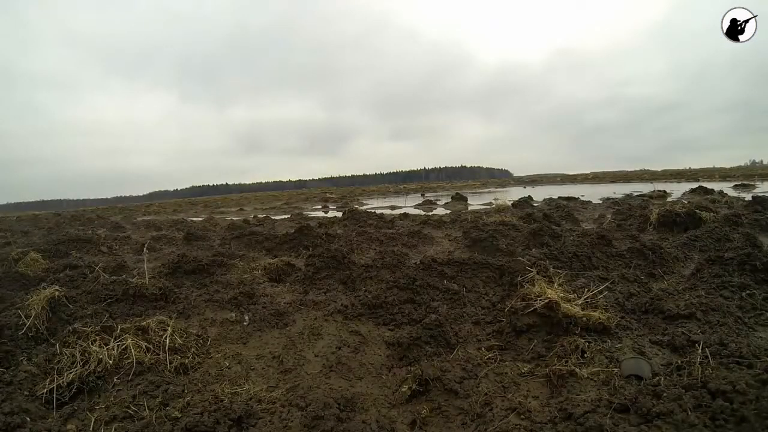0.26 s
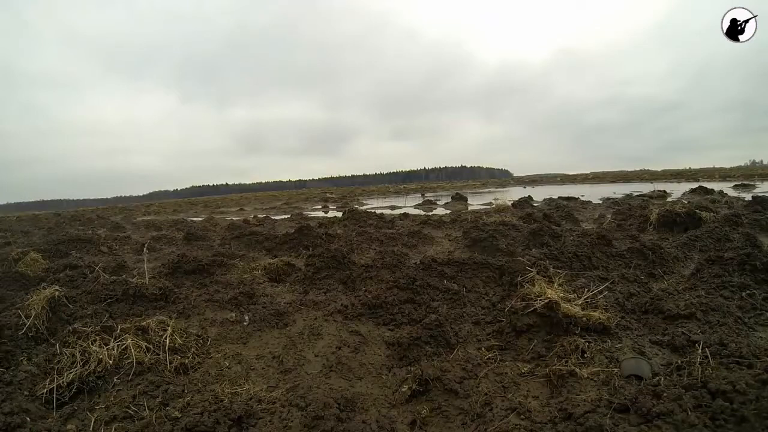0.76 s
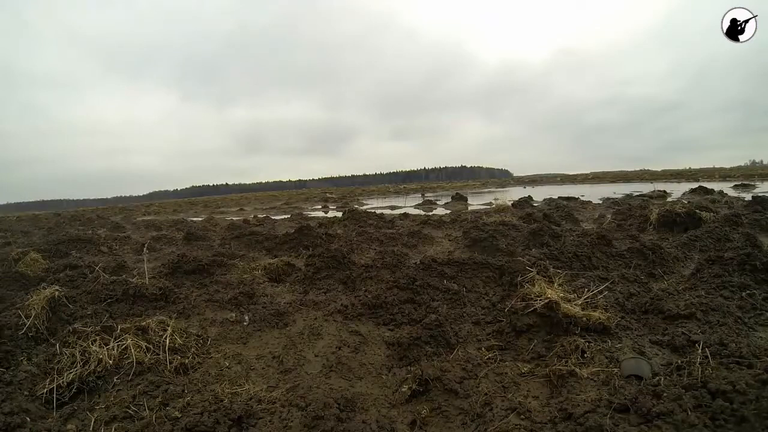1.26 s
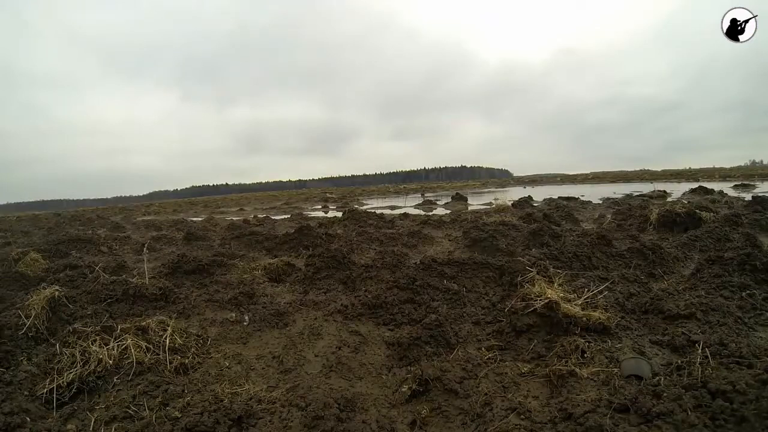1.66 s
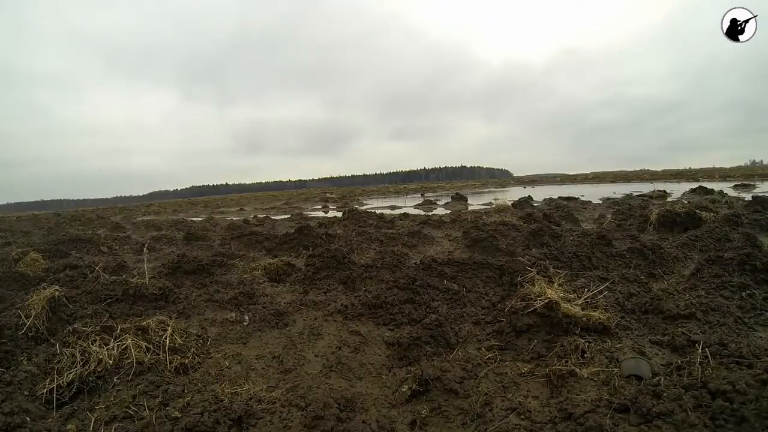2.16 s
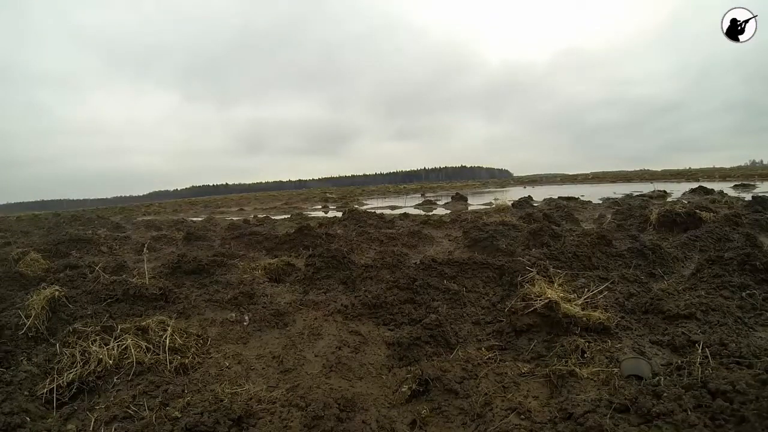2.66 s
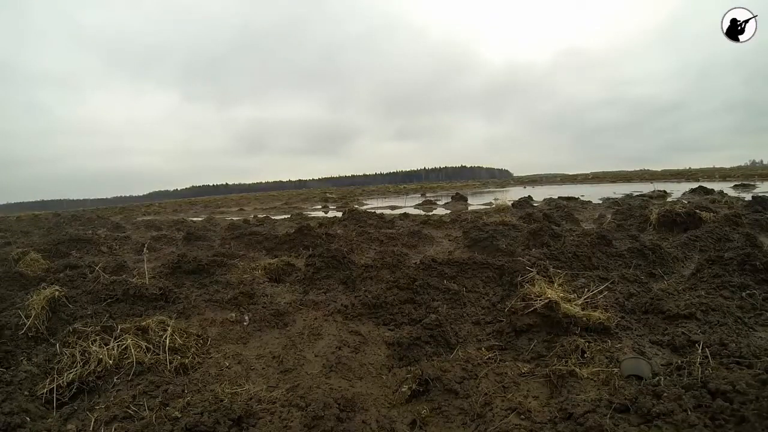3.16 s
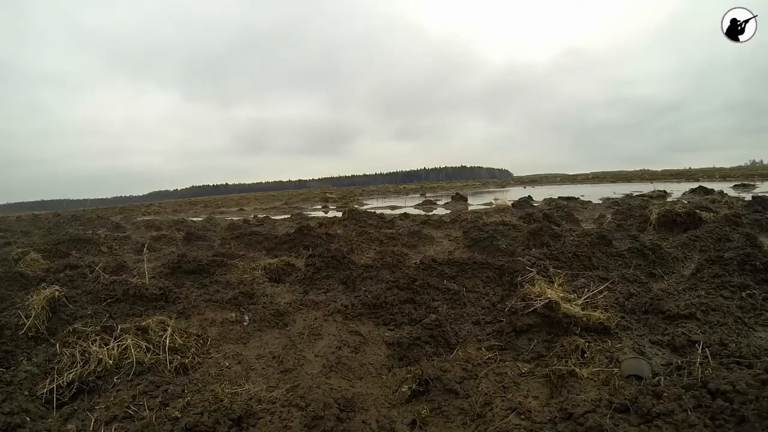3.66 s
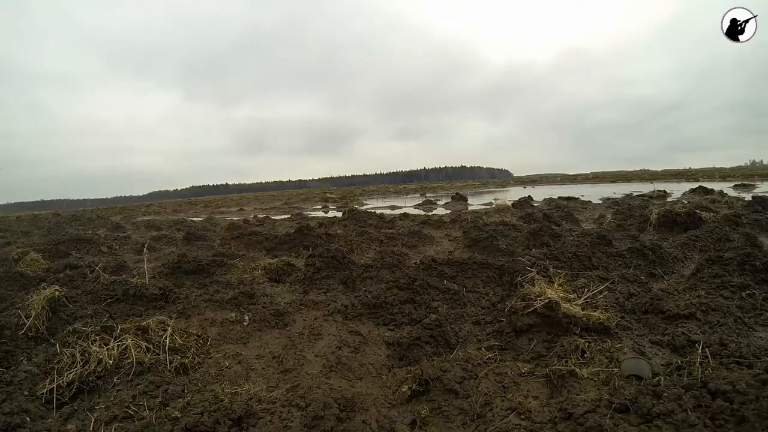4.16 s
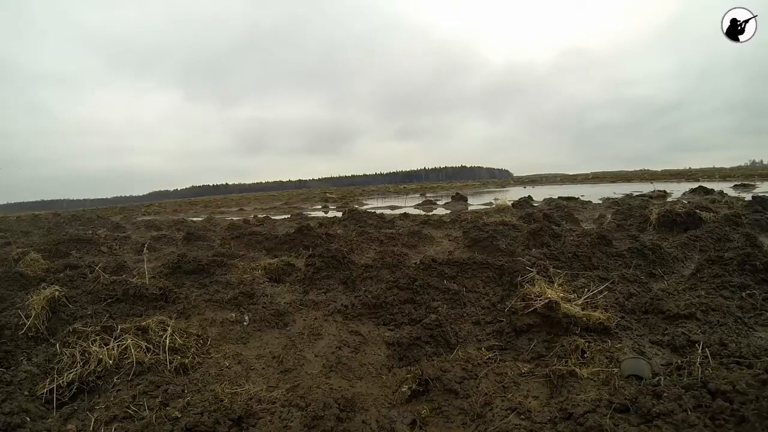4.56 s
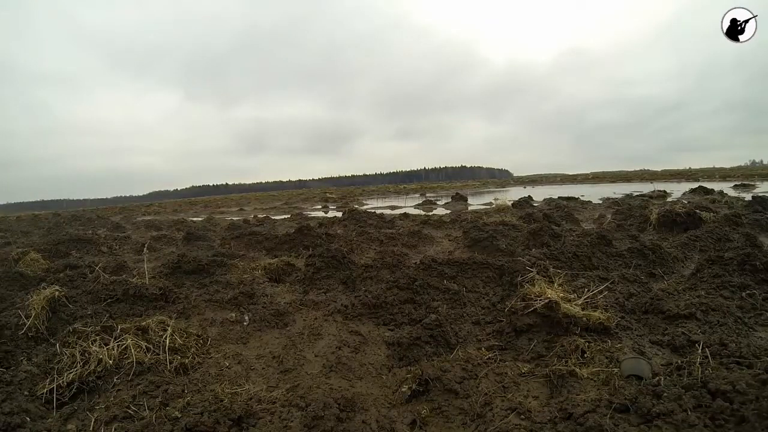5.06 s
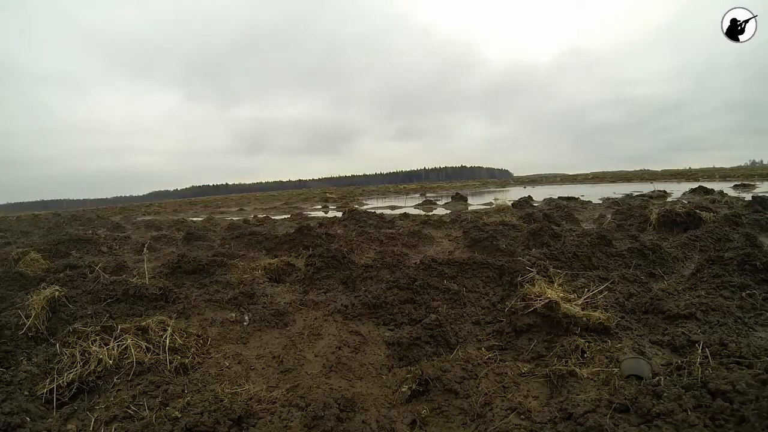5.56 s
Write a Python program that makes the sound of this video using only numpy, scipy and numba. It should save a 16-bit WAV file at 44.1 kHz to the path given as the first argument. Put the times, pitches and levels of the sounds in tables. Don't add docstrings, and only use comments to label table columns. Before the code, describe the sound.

A duck gives five loud, raspy, nasal quacks about a second apart across an open field, over light wind and faint birds.

```python
import sys
import numpy as np
from scipy import signal
from scipy.fft import rfft, irfft
from scipy.io import wavfile
from scipy.ndimage import uniform_filter1d
from numba import njit

SR = 44100
rng = np.random.default_rng(int(sys.argv[2]) if len(sys.argv) > 2 else 0)


def materialize(psi):
    bounded = np.clip(np.atleast_2d(psi).T, -1, 1)
    quanta = np.round(bounded * 32767).astype(np.int16)
    wavfile.write(sys.argv[1], SR, quanta)


def gain_from_db(level_db):
    decades = np.asarray(level_db, float) / 20
    return 10 ** decades


N = 256220

# [f/Hz, level per Hz/dB]
AIR = [(440, -57), (750, -0.5), (1740, -3), (2290, -5.5), (2560, -4.5), (5170, -8), (5790, -7.5),
       (10300, -8.5), (11100, -7.5), (15000, -7)]
# [f/Hz, likeness 0-1]
AIR_LIKENESS = [(600, 0.58), (1400, 0.29), (3000, 0.096), (6700, 0.05), (14000, 0.12)]
AIR_DB = -66
WHINE_HZ, WHINE_DB = 11000, -76.5
# [f/Hz, width/Hz, level/dB]
INSECTS = (5250, 350, -84)

# [t/s, buffeting level/dB, flutter level/dB]
GUSTS = [(0.0, -69, -66.5), (0.21, -65, -66.5), (0.32, -63.5, -70.5), (0.47, -69, -66.5),
         (0.55, -65.5, -68), (0.79, -68, -70), (1.26, -65, -68.5), (2.09, -67.5, -66), (2.22, -63.5, -67.5),
         (2.96, -68.5, -67), (3.15, -68, -68.5), (3.83, -65, -67.5), (4.24, -65.5, -66.5),
         (4.59, -64.5, -68.5), (4.95, -69.5, -66.5), (5.37, -66, -69), (5.7, -67.5, -66), (5.81, -62, -68)]
# [t/s, length/s, depth/dB]
LULLS = [(.43, 0.023, 14), (0.594, 0.022, 23), (1.464, 0.022, 16), (1.944, 0.028, 15), (2.76, 0.022, 11),
         (3.068, 0.018, 7), (3.798, 0.034, 11), (4.809, 0.016, 17), (5.185, 0.047, 1), (5.57, 0.016, 6)]
# [low f/Hz, high f/Hz, bumps per s, level/dB, left-right likeness 0-1, share of flutter 0-1]
EDDIES = [
    (22.5, 47, 60, -2.5, 0.12, 0.11),
    (40, 125, 90, -2, 0.36, 0.16),
    (93.5, 242, 120, -0.5, 0.79, 0.32),
    (195, 495, 90, -5, 0.94, 0.73),
    (385, 594, 70, -2.5, 0.98, 0.99),
]
BUFFET_DB, PUFF_DB, FLUTTER_PUFF_DB = 4.5, 2.5, 1.7

# [t/s, peak level/dB, f/Hz]
TICKS = [
    (2.299, -54, 6000),
    (2.338, -60, 9000),
    (2.348, -62, 7000),
]

# [t/s, length/s, first f/Hz, last f/Hz, level/dB]
FAR_WHISTLES = [(0, .19, 3040, 3030, -80), (.225, .05, 4800, 4750, -80), (1.14, .035, 4000, 4550, -82),
                (2.08, .13, 2750, 3300, -73), (2.212, .178, 3380, 3550, -70)]
# [t/s, length/s, first f/Hz, last f/Hz, level/dB]
FAR_DROPS = [(1.178, .075, 4600, 2900, -79), (1.3, .105, 4300, 2850, -80)]
# [t/s, length/s, first f/Hz, last f/Hz, level/dB]
FAR_TRILLS = [(.65, .19, 3200, 2850, -81), (.9, .225, 5300, 3720, -78)]
# [t/s, length/s, first f/Hz, last f/Hz, level/dB]
PIPIT = [
    (2.14, .077, 5250, 4150, -67),
    (2.615, .047, 4480, 4200, -70),
    (2.668, .044, 4480, 4150, -70),
    (2.722, .042, 4430, 4120, -70),
    (2.775, .045, 4380, 4060, -71),
    (2.83, .035, 4400, 4070, -79),
    (2.895, .035, 4300, 4080, -81),
]
# [t/s, length/s, first f/Hz, last f/Hz, level/dB]
CHIPS = [(2.668, .014, 3700, 3200, -74), (2.722, .014, 3700, 3200, -76), (2.768, .014, 3700, 3150, -73)]
FAR_LAG_S = .00011
NOTE_EDGE, NOTE_FADE_DB = .17, 9
SWOOP, DROP = 3.2, .45
TRILL_HZ, TRILL_DEPTH, TRILL_SWEEP = 45, .8, .06

# [t/s, length/s, settled flap rate f/Hz, settled bill resonance f/Hz, final level/dB]
QUACKS = [
    (1.566, 0.26, 283.6, 1796, -39),
    (2.35, .252, 315.3, 1850, -37),
    (3.238, .27, 318.6, 1834, -38.5),
    (4.211, .266, 324, 1872, -38),
    (5.25, 0.28, 319.3, 1924, -41.5),
]
# [unevenness/dB, timing jitter/ms, breath share 0-1]
VOICE = [(1.6, .022, .07), (2.4, .04, .1), (2.4, .04, .1), (2.7, .045, .1), (2.2, .022, .06)]
# [place in the cycle 0-1, level/dB]
SECOND_FLAP = [(.455, -5), (.44, -4), (.44, -4), (.44, -3.5), (.45, -6)]
# [first flap rate f/Hz, bill opening t/s, attack t/s, crescendo/dB, early accent/dB]
EFFORT = [(263.2, .06, 0.011, 0.3, -3), (267.7, .045, .007, 3, 2.5), (257.3, .06, 0.0073, 4, -0.8),
          (265, .05, 0.0075, 4, .1), (277, .085, 0.012, -2, -0.7)]
# [chest level/dB, windpipe level/dB, rasp level/dB, hiss level/dB]
COLOUR = [(-22, -16.5, -17.5, -19.5), (-22, -18, -15, -17), (-19.5, -14.5, -10.5, -11.5),
          (-20.5, -14, -10, -12), (-19, -17, -14.5, -20.5)]
CLOSED_BILL = [.89, 0.89, 0.85, 0.84, 0.89]
HEAD = [(1.2, 1, -6.5, -10, -2), (3.6, 1.5, -2.5, -12, 0), (0.095, 1.5, -0.5, -2, 0.36),
        (0.11, 1.8, -0.5, -2, -2.1), (.1, 1, 5, -19, -2)]
# [multiple of the two-flap cycle, level/dB]
CHEST = [(1, -26), (2, 1), (3, -3), (4, -15.5), (5, -11), (6, -10.5)]
# [f/Hz, width/Hz, level/dB]
WINDPIPE = [(1218, 190, 2.5), (645, 230, -5)]
# [share of the bill resonance, width/Hz, level/dB]
BILL = [(0.968, 230, 7), (1.15, 324, 1), (1.33, 400, -6)]
# [f/Hz, width/Hz, level/dB]
RASP = [(2990, 405, 4), (3524, 580, -2.5)]
# [f/Hz, width/Hz, level/dB]
HISS = [(4760, 1240, -8), (5480, 280, -1), (6500, 1560, -8.5), (8780, 1140, -13), (10700, 2300, -17.5)]
SWELL = 2.4
SETTLE_S = .045
OPENING_POWER, SHUT_DB = 1.7, 1.5
EDGE_DB, RELEASE_S = 38.5, 0.0083
CHEST_EDGE, CHEST_SWING = 0.4, 0.26
CREEP_HZ, LAST_LIFT_HZ, LIFT_S = 7, 12, .012
ACCENT_AT_S, ACCENT_S = 0.049, 0.014
RASP_GROWS_DB, HISS_GROWS_DB = 3, 0.5
SHUT_RASP_DB, SHUT_HISS_DB, PATCHY_DB = 2, 7, 1.5

# [f/Hz, left-right level/dB]
DUCK_PAN = [(300, -3.0), (1300, -2.7), (1800, -3.1), (2500, -4.6), (4500, -5.5), (6300, -4.5), (7600, -0.3)]
# [t/s, level/dB]
ECHOES = [(.0023, -15), (.0031, -19), (.021, -40), (.043, -29), (.068, -38), (.097, -28.5), (.032, -26),
          (.055, -29), (.083, -46), (.115, -42)]


def rms_one(x):
    return x / np.sqrt(np.mean(x ** 2) + 1e-20)


def band(x, low_hz, high_hz, order):
    return signal.sosfilt(signal.butter(order, [low_hz, high_hz], "band", fs=SR, output="sos"), x)


def in_time(rows):
    s, *columns = np.transpose(rows)
    return [np.interp(np.arange(N) / SR, s, column) for column in columns]


def sounding(tables, fade_s=0.0057):
    t = np.arange(N) / SR
    on = sum(1. * (t >= rows[0][0]) * (t <= rows[-1][0]) for rows in tables)
    return uniform_filter1d(on, int(fade_s * SR))


def at_hz(points, hz):
    points_hz, values = np.transpose(points)
    return np.interp(np.log(hz), np.log(points_hz), values)


def drift(rate):
    r = np.exp(-2 * np.pi * rate / SR)
    return rms_one(signal.lfilter([1], [1, -2 * r, r * r], rng.standard_normal(N + SR))[SR:])


def pair(mid, side, alike):
    return np.sqrt(1 + alike) * mid + np.sqrt(1 - alike) * side * np.array([[1], [-1]])


@njit
def resonate(x, hz, width, swell, rate):
    for band_hz in (width, width * swell):
        r, y = np.exp(-np.pi * band_hz / rate), np.zeros(len(x))
        for i in range(2, len(x)):
            push = (1 - r * r) / 2 * (x[i] - x[i - 2])
            y[i] = push + 2 * r * np.cos(2 * np.pi * hz[i] / rate) * y[i - 1] - r * r * y[i - 2]
        x = y
    return x


def air():
    out, edges, white = 0, np.geomspace(620, 17000, 11), rng.standard_normal((2, 2, N))
    for k, (low, high) in enumerate(zip(edges, edges[1:])):
        mid, side = band(white[k % 2], low, high, 2)
        hz = np.sqrt(low * high)
        out = out + gain_from_db(at_hz(AIR, hz) + .9 * drift(10)) * pair(mid, side, at_hz(AIR_LIKENESS, hz))
    insect_hz, width, insect_db = INSECTS
    insects = rms_one(resonate(white[0].sum(axis=0), np.full(N, 1. * insect_hz), 1. * width, SWELL, SR))
    whine = np.sqrt(2) * gain_from_db(WHINE_DB + 0.45 * drift(7.8)) * np.sin(2 * np.pi * WHINE_HZ * np.arange(N) / SR)
    return gain_from_db(AIR_DB) * out / np.std(out.mean(axis=0)) + whine + gain_from_db(insect_db) * insects


def gusts():
    t = np.arange(N) / SR
    buffet_db, flutter_db = in_time(GUSTS)
    lull_db = sum(db * np.exp(-((t - s) / length) ** 2) for s, length, db in LULLS)
    buffet_db = buffet_db + BUFFET_DB - lull_db + PUFF_DB * drift(6.0)
    return buffet_db, flutter_db + FLUTTER_PUFF_DB * drift(8.0)


def wind():
    out, (slow_db, quick_db) = 0, gusts()
    for low_hz, high_hz, per_s, db, alike, quick in EDDIES:
        sizes = rng.uniform(0.42, 1, (2, N)) * rng.choice([-1, 1], (2, N))
        pushes = (rng.random((2, N)) < per_s / SR) * sizes + 1e-12
        bumps = signal.sosfilt(signal.bessel(4, high_hz, fs=SR, output="sos"), pushes)
        bumps = signal.sosfilt(signal.butter(1, low_hz, "high", fs=SR, output="sos"), bumps)
        level_db = db - 2.5 + quick * quick_db + (1 - quick) * slow_db + 1.9 * drift(55)
        out = out + gain_from_db(level_db) * pair(*rms_one(bumps), alike)
    return 0.0058 * np.tanh(out / 0.0058)


def ticks():
    out = np.zeros((2, N))
    for s, db, hz in TICKS:
        snap = gain_from_db(db) * rng.standard_normal((2, 400)) * np.exp(-np.arange(400) / (.002 * SR))
        snap = band(pair(*snap, 0.64), 0.23 * hz, min(2 * hz, .45 * SR), 1)
        out[:, int(s * SR):int(s * SR) + 400] += snap
    return out


def note(start, length, first_hz, last_hz, db, swoop=1, trill=0):
    part = np.linspace(0, 1, num=11)
    fade = np.clip(1 - np.minimum(part, 1 - part) / NOTE_EDGE, 0, 1)
    hz = last_hz + (first_hz - last_hz) * (1 - part) ** swoop
    return np.transpose([start + length * part, hz, db - NOTE_FADE_DB * fade, trill + 0 * part])


def whistle(tables):
    hz, level_db, trill = in_time(np.concatenate(tables))
    beat = 2 * np.pi * TRILL_HZ * np.arange(N) / SR
    wobble = 1 + 0.01053 * drift(88.8) + TRILL_SWEEP * trill * np.cos(beat)
    turn = 2 * np.pi * np.cumsum(hz * wobble) / SR
    return np.sqrt(2) * gain_from_db(level_db) * (1 + trill * np.sin(beat)) * sounding(tables) * np.sin(turn)


def far_song():
    plain = whistle([note(*row) for row in FAR_WHISTLES])
    drops = whistle([note(*row, DROP) for row in FAR_DROPS])
    return plain + drops + whistle([note(*row, SWOOP, TRILL_DEPTH) for row in FAR_TRILLS])


def birds():
    right = far_song()
    left = np.interp(np.arange(N) - FAR_LAG_S * SR, np.arange(N), right)
    far = np.array([gain_from_db(-4.0) * left, right])
    pipit = whistle([note(*PIPIT[0], SWOOP)] + [note(*row) for row in PIPIT[1:]])
    chips = whistle([note(*row) for row in CHIPS])
    near = (gain_from_db(-2.5) * pipit + chips) * gain_from_db(np.array([[-2.2], [2.2]]))
    return gain_from_db(3.0) * far + near


def per_quack(table, t):
    which = np.clip(np.searchsorted(np.array(QUACKS)[:, 0] - .1, t) - 1, 0, None)
    return np.array(table)[which].T


def flaps(cycles):
    whole = np.arange(int(cycles[-1]) - 1)
    starts = np.searchsorted(cycles, whole)
    place, second_db = per_quack(SECOND_FLAP, starts / SR)
    uneven_db, jitter_ms, breath = per_quack(VOICE, starts / SR)
    since = starts / SR - per_quack(QUACKS, starts / SR)[0]
    paired = np.clip(since / SETTLE_S, 0, 1) ** 2
    place, second_db = .5 + (place - .5) * paired, second_db * paired
    seconds = np.searchsorted(cycles, whole + place)
    chance, clicks, puffs = rng.standard_normal((len(whole), 4)), np.zeros(N), np.zeros(N)
    for k, (at, level_db) in enumerate([(starts, 0 * place), (seconds, second_db)]):
        late = jitter_ms * SR / 1000 * (3 * k * drift(40)[at] + chance[:, k])
        at = np.clip(at + np.round(late).astype(int), 0, N - 1)
        clicks[at] = gain_from_db(level_db + uneven_db * k * chance[:, 2 + k])
        puffs[at] = clicks[at] * breath
    puffs = signal.lfilter([.45], [1, -np.exp(-1 / (.0014 * SR))], puffs) * rng.standard_normal(N)
    return clicks, puffs


def throat(source, modes, scale_hz, turn_db=np.zeros(5)):
    out = 0
    for k, (hz, width, db) in enumerate(modes):
        ring = resonate(source, hz * scale_hz, 1. * width, SWELL, SR)
        out = out + (-1) ** k * gain_from_db(db + turn_db[k]) * ring
    return out / np.sqrt(uniform_filter1d(out ** 2, SR // 30) + 1e-20)


def duck():
    t = np.arange(N) / SR
    start, length, flap_hz, bill_hz, level_db = per_quack(QUACKS, t)
    first_hz, opening_s, attack_s, crescendo_db, accent_db = per_quack(EFFORT, t)
    chest_db, pipe_db, rasp_db, hiss_db = per_quack(COLOUR, t) + level_db
    since = np.clip(t - start, 0, length)
    ahead = 1 - since / length
    shut = np.exp(-(since / opening_s) ** OPENING_POWER)

    creep_hz = CREEP_HZ * (ahead - .4) * (1 - shut)
    lift_hz = LAST_LIFT_HZ * np.exp(-ahead * length / LIFT_S)
    flap_hz = flap_hz + (first_hz - flap_hz) * shut - creep_hz + lift_hz
    bill_hz = bill_hz * (1 - (1 - per_quack(CLOSED_BILL, t)) * shut)

    edge_db = -EDGE_DB * (np.exp(-since / attack_s) + np.exp(-ahead * length / RELEASE_S))
    accent = np.exp(-((since - ACCENT_AT_S) / ACCENT_S) ** 2)
    swell_db = accent_db * accent - crescendo_db * ahead - SHUT_DB * shut
    effort_db = edge_db + swell_db
    rasp_db += effort_db - RASP_GROWS_DB * ahead - SHUT_RASP_DB * shut + PATCHY_DB * drift(23)
    hiss_db += effort_db - HISS_GROWS_DB * ahead - SHUT_HISS_DB * shut + PATCHY_DB * drift(19)

    cycles, steady = np.cumsum(flap_hz / 2) / SR, np.ones(N)
    clicks, puffs = flaps(cycles)
    chest = 0
    for k, db in CHEST:
        chest = chest + gain_from_db(db + 2.0 * drift(75)) * np.sqrt(2) * np.sin(2 * np.pi * k * cycles + k * k)
    voice = gain_from_db(chest_db + CHEST_EDGE * edge_db + CHEST_SWING * swell_db) * chest
    voice += gain_from_db(level_db + effort_db) * throat(clicks + puffs, BILL, bill_hz)
    voice -= gain_from_db(pipe_db + effort_db) * throat(clicks + 5.0 * puffs, WINDPIPE, steady)
    voice -= gain_from_db(rasp_db) * throat(clicks + 1.8 * puffs, RASP, steady)
    voice -= gain_from_db(hiss_db) * throat(clicks + 2.8 * puffs, HISS, steady, per_quack(HEAD, t))
    return voice * sounding([[(s,), (s + length_s,)] for s, length_s, *_ in QUACKS])


def field(voice):
    pan = gain_from_db(at_hz(DUCK_PAN, np.fft.rfftfreq(N, 1 / SR) + 1) / 2)
    out = np.array([irfft(rfft(voice) * pan, N), irfft(rfft(voice) / pan, N)])
    dull = band(voice, 700, 6500, 2)
    for k, (s, db) in enumerate(ECHOES):
        out[k % 2] += gain_from_db(db) * np.roll(dull, int(s * SR))
    return out


def scene():
    background = (air() + wind()) * gain_from_db(np.array([[-.3], [.3]]))
    return background + ticks() + birds() + field(duck())


def band_limit(x):
    return signal.sosfilt(signal.butter(12, 15340, fs=SR, output="sos"), x)


def record(dry):
    return band_limit(dry)


dry = scene()
out = record(dry)
materialize(out)
```